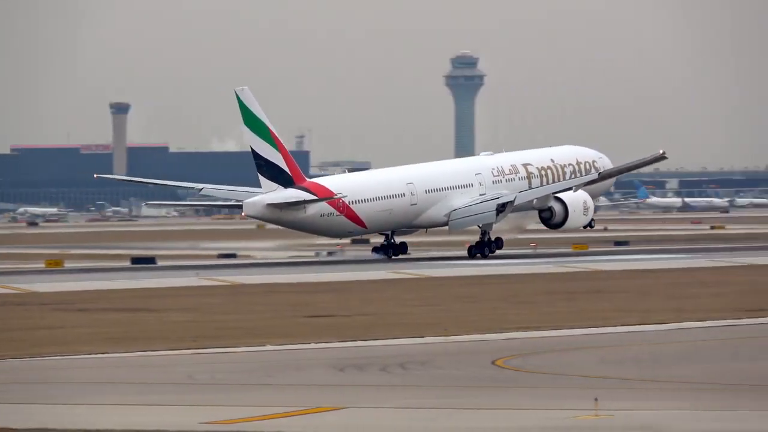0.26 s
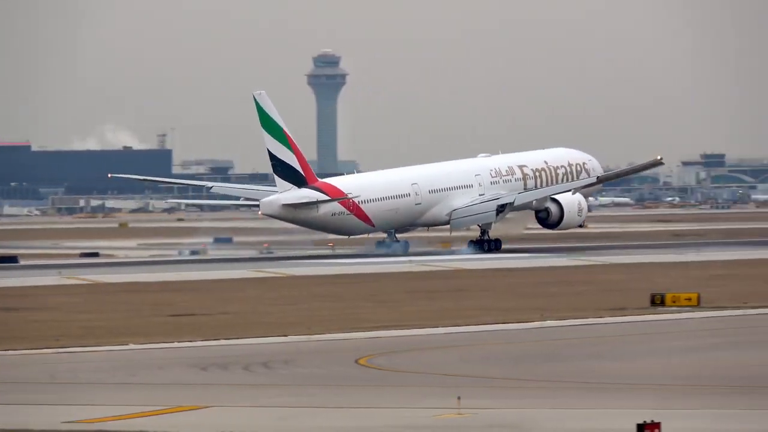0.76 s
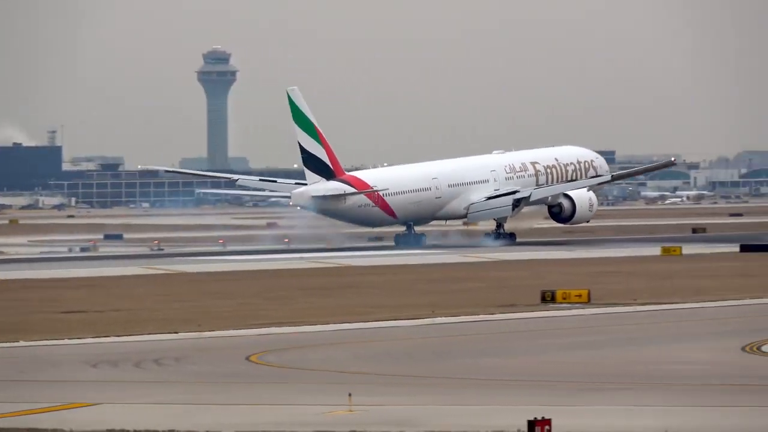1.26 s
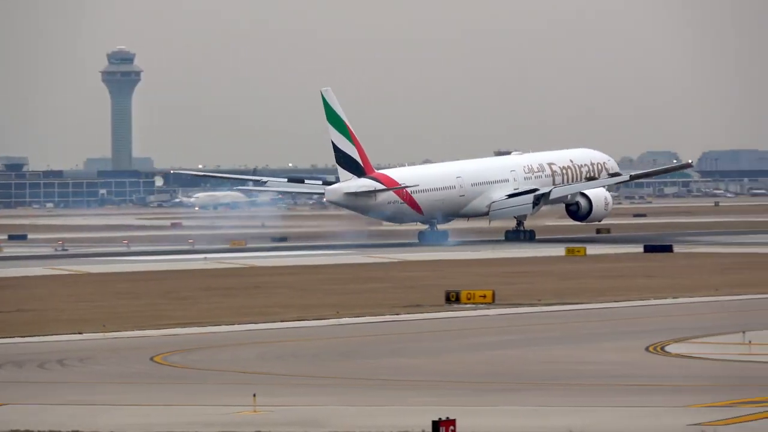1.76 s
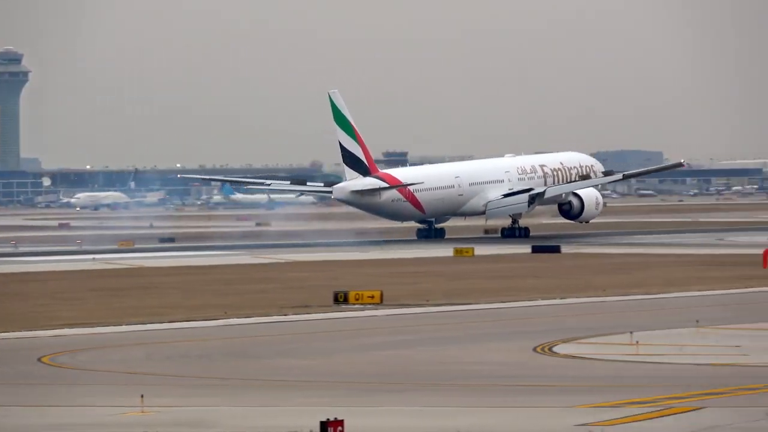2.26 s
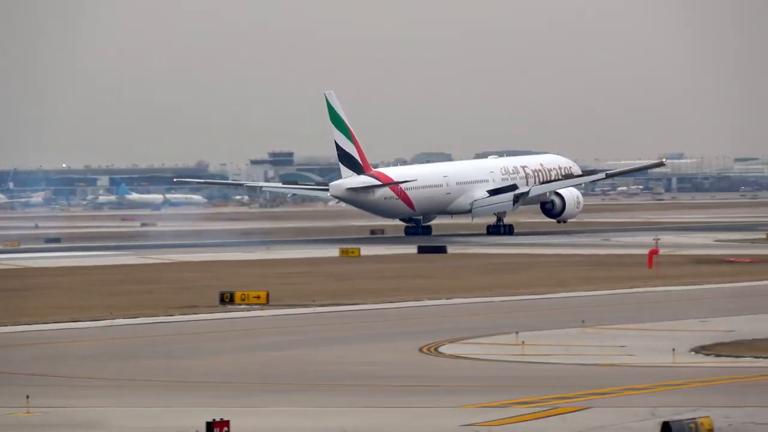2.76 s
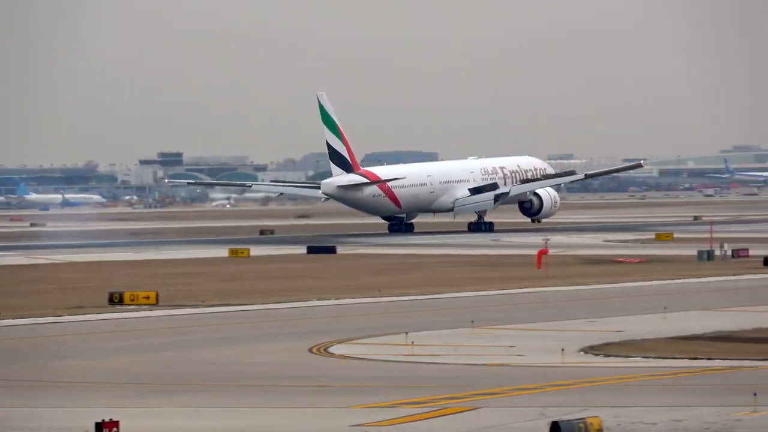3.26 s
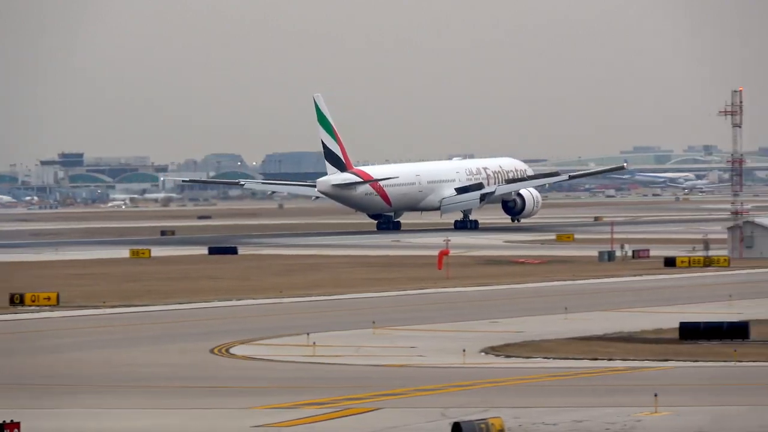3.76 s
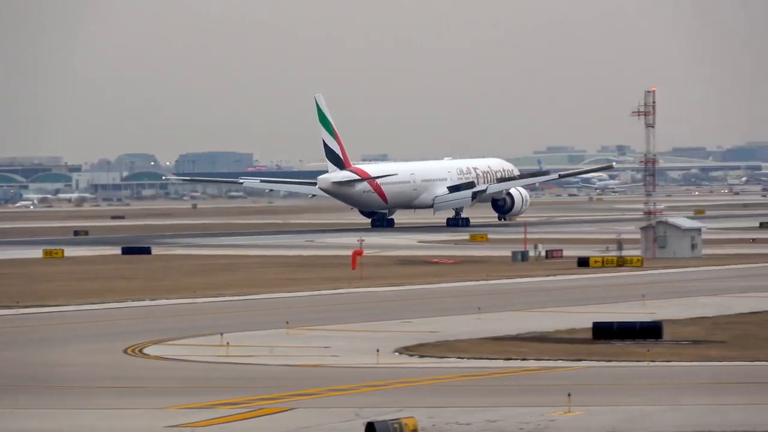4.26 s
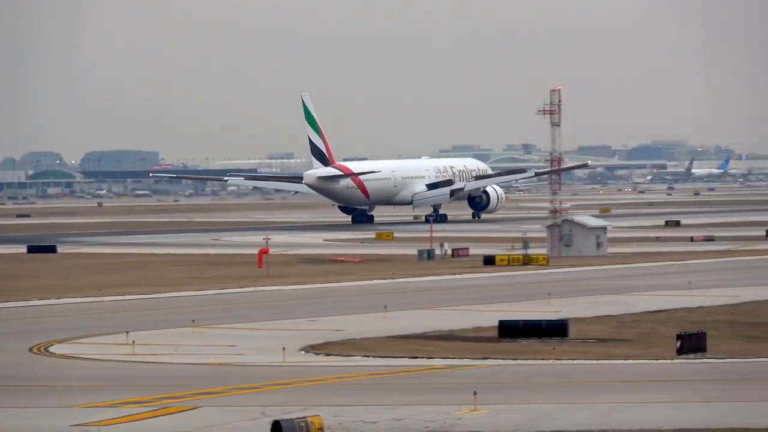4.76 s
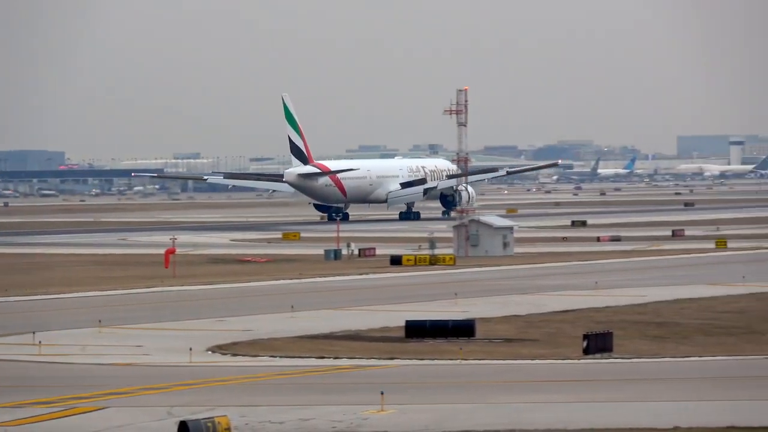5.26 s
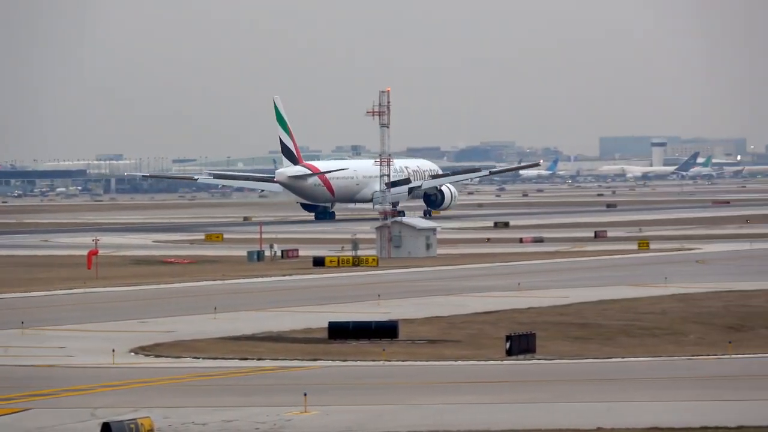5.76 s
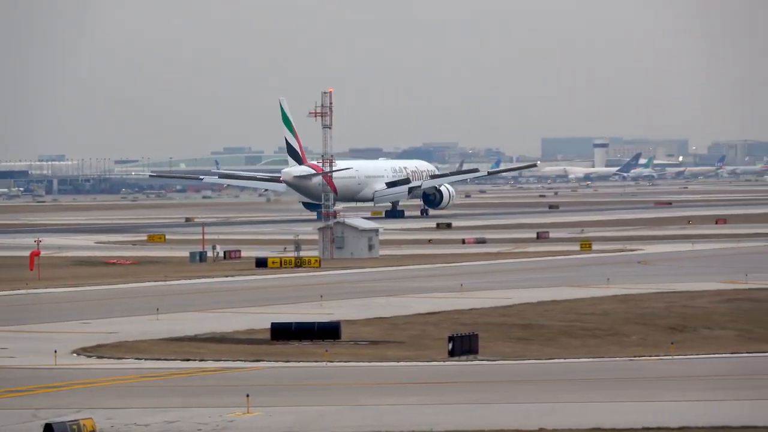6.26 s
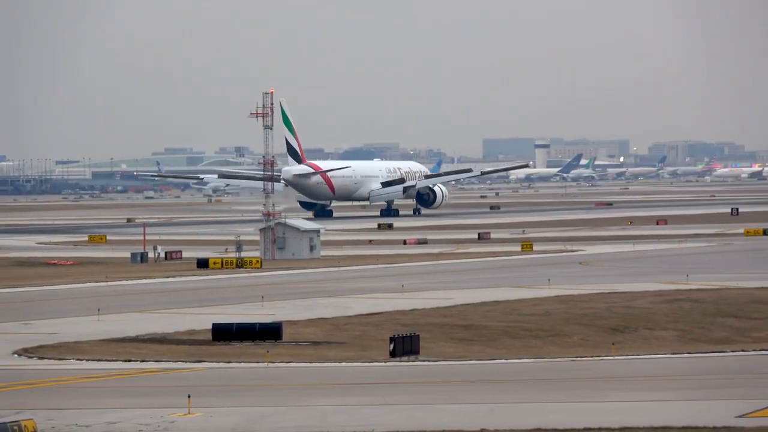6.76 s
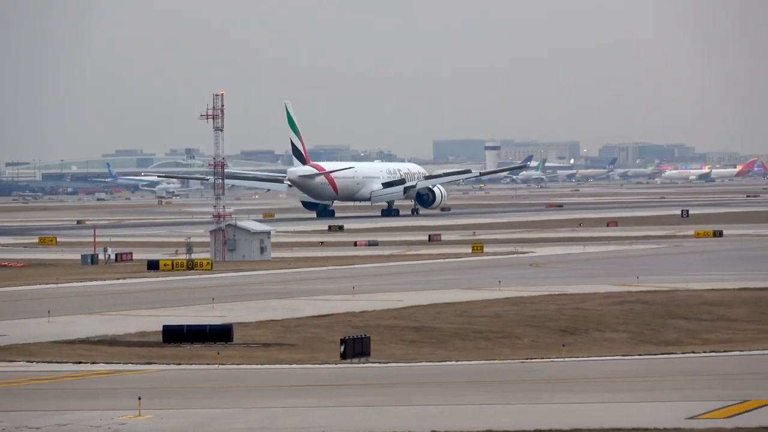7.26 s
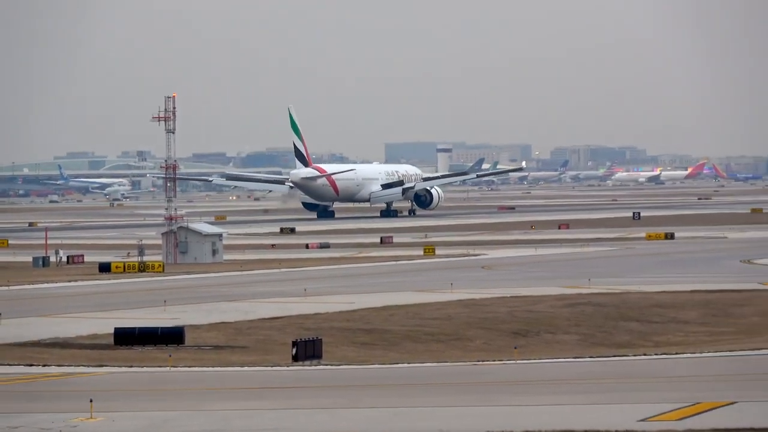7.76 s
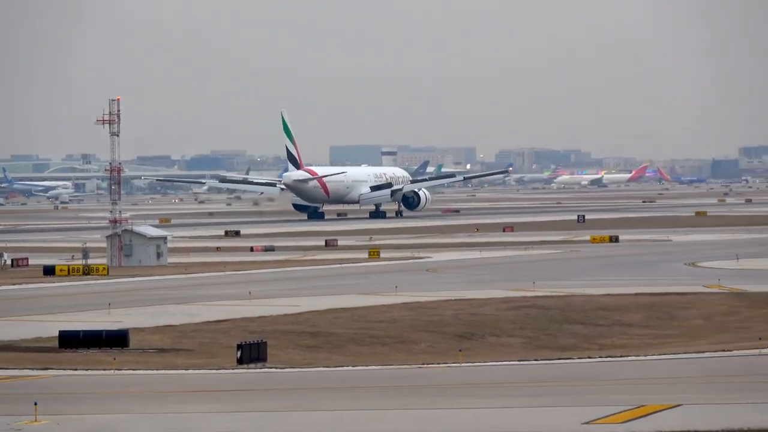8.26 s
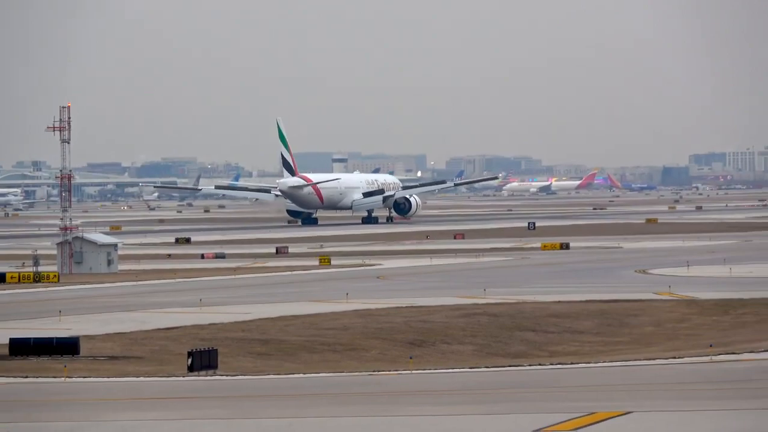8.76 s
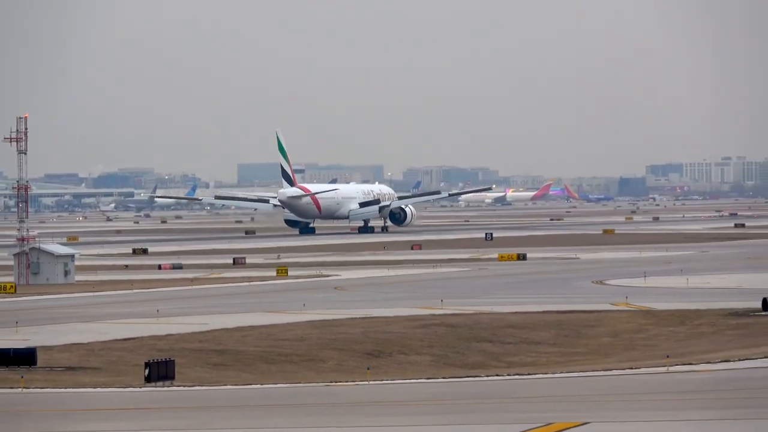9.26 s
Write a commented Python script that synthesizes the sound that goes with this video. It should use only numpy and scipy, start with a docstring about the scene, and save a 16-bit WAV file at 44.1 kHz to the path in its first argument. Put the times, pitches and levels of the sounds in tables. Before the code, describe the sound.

Deep jet rumble and roar build as a landing airliner recedes along the runway, with a sinking hollow tone, camera clicks and later small close ticks.

```python
"""At an airfield's edge, a wide-body airliner touches down and rolls away along the runway.
Its exhausts rumble and roar as shaped noise, and hiss more as the nozzles turn towards the listener.
A sinking airframe tone (two sine partials) fades after touchdown and a blurred fan whine takes over.
Shutter bursts, ringing ticks, clicks and a tiny squeak sound close by, over a low far drone and faint hiss."""
import sys
import numpy as np
from scipy import signal
from scipy.fft import rfft, irfft, next_fast_len
from scipy.io import wavfile
from scipy.ndimage import uniform_filter1d, map_coordinates

SR = 44100
rng = np.random.default_rng(int(sys.argv[2]) if len(sys.argv) > 2 else 0)


def file_out(sig):
    """Save sig as 16-bit WAV at sys.argv[1]."""
    # one column per channel
    cols = np.atleast_2d(sig).T
    # limit, then scale
    lim = np.clip(cols, -1, 1)
    pcm = np.round(lim * 32767).astype(np.int16)
    wavfile.write(sys.argv[1], SR, pcm)


N = 420273
TOP_HZ = 15700  # upper band limit
REFERENCE_DB = -23  # jet strength at which the layers it drives have their stated levels

# strength of the exhaust as it reaches the listener: (time [s], level [dB])
JET_STRENGTH = [(0, -25.5), (1.2, -26.5), (2.2, -27), (3, -26), (3.45, -27), (4, -25), (4.3, -23.5),
                (4.75, -22.5), (5.3, -21.5), (5.9, -19.5), (6.3, -20), (6.8, -19), (7.3, -17.5),
                (7.9, -18.5), (8.5, -17.5), (9.05, -16.5), (9.53, -16.5)]


def amp(db):
    """Decibels to gain."""
    return 10 ** (np.asarray(db) / 20)


def unit(x):
    """Scale to rms 1."""
    return x / np.sqrt(np.mean(x ** 2) + 1e-20)


def clock():
    """The time of every sample in seconds."""
    return np.arange(N) / SR


def curve(rows):
    """Join rows of (time, value) by straight lines, one value per sample."""
    times, values = np.transpose(rows)
    return np.interp(clock(), times, values)


def wobble(rate):
    """A smooth random curve, rate knots a second."""
    knots = rng.standard_normal(int(N * rate / SR) + 4)
    return map_coordinates(knots, [np.arange(N) * rate / SR])


def filtered(x, response):
    """Shape x by a gain that depends on frequency."""
    size = next_fast_len(N + SR // 2)
    gain = response(np.fft.rfftfreq(size, 1 / SR))
    return irfft(rfft(x, size) * gain, size)[:N]


def turbulence(spectrum, patchy_db):
    """Coloured noise of rms 1; moving air lifts and sinks patches of it in time and frequency."""
    grains = signal.stft(rng.standard_normal(N), nperseg=1024)[2]
    patches = uniform_filter1d(rng.standard_normal(grains.shape), size=8, axis=0)
    patches = uniform_filter1d(patches, size=12, axis=1)
    noise = signal.istft(grains * amp(patchy_db * unit(patches)), nperseg=1024)[1][:N]
    corner_hz, corner_db = np.transpose(spectrum)
    return unit(filtered(noise, lambda hz: amp(np.interp(np.log(hz + 1), np.log(corner_hz), corner_db))))


def steadied(x, seconds):
    """Noise that keeps its grain but holds an even strength over longer spans."""
    power = np.abs(uniform_filter1d(x ** 2, size=max(int(seconds * SR), 1)))
    return unit(x / np.sqrt(power + 1e-9))


def band(centre_hz, width_hz):
    """Noise of rms 1 in one resonance with steep skirts."""
    return unit(filtered(rng.standard_normal(N), lambda hz: 1 / (1 + ((hz - centre_hz) / width_hz) ** 2)))


def phase(hz):
    """Running phase of a gliding frequency."""
    return 2 * np.pi * np.cumsum(hz) / SR


def tone(hz, flutter_db):
    """A line of rms 1 whose strength flutters on its way through the air."""
    line = np.sin(phase(hz) + rng.uniform(0, 2 * np.pi))
    return unit(line * amp(flutter_db * wobble(17)))


def release(end_s):
    """Gain that holds until end_s, then dies away at 45.5 dB per second."""
    return amp(-45.5 * np.maximum(clock() - end_s, 0))


def strikes(rows):
    """Envelope of sudden, dying blows from rows (time [s], peak [dB], t60 [s])."""
    envelope, t = np.zeros(N + SR), np.arange(SR // 5) / SR
    for s, db, t60 in rows:
        envelope[round(s * SR):][:len(t)] += amp(db - 60 * t / t60)
    return envelope[:N]


def jet_rise_db():
    """Strength of the exhaust above the reference, in dB."""
    return curve(JET_STRENGTH) - REFERENCE_DB


def exhaust():
    """One jet strength drives big eddies that rumble and smaller ones that roar and rush.

    The gap between rumble and roar is the notch left by the ground reflection.
    """
    # colours of the eddies, large to small: (frequency [Hz], relative level [dB])
    rumble_colour = [(15, -35), (28, -17), (40, -7), (52, -0.5), (65, 1), (85, -1.5), (115, -7),
                     (150, -25.5), (220, -35), (500, -82)]
    roar_colour = [(90, -31.5), (160, -11), (230, -4), (310, -0.5), (390, -0.5), (495, -0.5), (600, -6.5),
                   (760, -14), (1100, -29), (2500, -80.5)]
    far_roar_colour = [(90, -30), (160, -11), (230, -2.5), (310, 0), (390, 1.5), (490, -1), (600, -8.5),
                       (760, -10), (1100, -29), (2500, -80.5)]
    rush_colour = [(350, -32), (600, -3.5), (780, -1.5), (970, 1), (1130, -2.5), (1300, -7), (1450, -11),
                   (1700, -23.5), (2200, -42), (4000, -92)]
    # the air briefly carries the rush better: (time [s], gain [dB], half length [s])
    rush_swells = [(2.9, 0, 0.39), (5.96, 2, 0.1), (7.301, 4, 0.45)]
    # the rumble jumps as the thrust reversers open, then settles
    reverse_s, reverse_attack_s, reverse_db, reverse_settle_s = 3.2, .2, 2.5, 3.5
    # the roar sinks in pitch as the airliner draws away
    recede_start_s, recede_s = 5.5, 3.3

    rise_db = jet_rise_db()
    # level at the reference strength [dB] + dB gained per dB of jet strength
    rumble_level = amp(-23 + 0.78 * rise_db)
    roar_level = amp(-22.5 + rise_db)
    rush_level = amp(-29.5 + 0.88 * rise_db)

    since = np.maximum(clock() - reverse_s, 0)
    thrust_db = reverse_db * np.minimum(since / reverse_attack_s, 1) * np.exp(-since / reverse_settle_s)
    rumble_gain = rumble_level * amp(thrust_db + 0.63 * wobble(7))
    rumble = rumble_gain * steadied(turbulence(rumble_colour, patchy_db=0.0), seconds=0.28)

    far = np.clip((clock() - recede_start_s) / recede_s, 0, 1)
    near_eddies = np.sqrt(1 - far) * turbulence(roar_colour, patchy_db=1.45)
    far_eddies = np.sqrt(far) * turbulence(far_roar_colour, patchy_db=1.5)
    roar = roar_level * steadied(near_eddies + far_eddies, seconds=.18)

    swell_db = sum(db * np.exp(-((clock() - s) / half) ** 2) for s, db, half in rush_swells)
    rush = rush_level * amp(swell_db) * turbulence(rush_colour, patchy_db=1.0)
    return rumble + roar + rush


def surges():
    """Now and then one register of the roar, a resonant band of noise, swells and sinks back."""
    # (time [s], half length [s], centre [Hz], width [Hz], level [dB])
    roar_surges = [(4.2, 0.49, 205, 45, -36.5), (4.753, 0.25, 477, 70, -30.5), (7.298, 0.54, 112, 18, -30)]
    total = np.zeros(N)
    for s, half, hz, width, db in roar_surges:
        total += amp(db) * np.exp(-((clock() - s) / half) ** 2) * band(hz, width)
    return total


def thumps():
    """A few cycles of low pressure swell and die within the rumble."""
    # (time [s], peak [dB])
    low_thumps = [(3.70, -20), (5.078, -10.5), (5.694, -13.5)]
    thump_hz, half_s = 72, 0.026
    total = np.zeros(N)
    for s, db in low_thumps:
        t = clock() - s
        bell_db = -8.7 * np.minimum((t / half_s) ** 2, 20)
        total += amp(db + bell_db) * np.cos(2 * np.pi * thump_hz * t)
    return total


def treble():
    """The exhaust's fine eddies hiss and sizzle out of the shade as the nozzles turn to the listener."""
    # colours of the fine eddies: (frequency [Hz], relative level [dB])
    hiss_colour = [(1500, -21), (2600, 5.5), (3100, 4), (3400, 0.5), (3900, 0.5), (4250, -4.5),
                   (4600, -9.5), (5200, -15.5), (6300, -28.5), (8000, -44.5), (16000, -65.5)]
    sizzle_colour = [(3500, -30), (4900, 0), (5800, 5), (6600, -2), (7600, -7.5), (10000, -14.5),
                     (12000, -18.5), (16000, -40)]
    # the air carries the treble now better, now worse: (time [s], gain [dB])
    air_drift = [(0, 0.5), (4.3, 0.5), (4.6, -2), (5.0, 0), (5.6, 0), (6.1, -2.5), (6.6, 1), (7.3, 0),
                 (8.5, 0), (9.05, 2), (9.53, 0)]
    # the hiss opens over turn_s; the finest sizzle creeps up with a longer lag
    turn_start_s, turn_s, sizzle_lag_s = 2.07, 3.46, 4.24
    # levels out of the shade, and the loss in full shade
    hiss_db, hiss_shade_db, sizzle_db, sizzle_shade_db = -50.5, 22.5, -56.5, 44

    since = np.maximum(clock() - turn_start_s, 0)
    hiss_shade = (1 + np.cos(np.pi * np.minimum(since / turn_s, 1))) / 2
    sizzle_shade = np.exp(-since / sizzle_lag_s)
    hiss = amp(hiss_db - hiss_shade_db * hiss_shade) * turbulence(hiss_colour, patchy_db=1.6)
    sizzle = amp(sizzle_db - sizzle_shade_db * sizzle_shade) * turbulence(sizzle_colour, patchy_db=0.5)
    return amp(curve(air_drift)) * (hiss + sizzle)


def airframe():
    """Air rushes over flaps and gear and blows a hollow tone across an opening in the wing."""
    # strength of the air rush: (time [s], relative level [dB])
    rush_strength = [(0, -39.5), (.4, -38), (.7, -41.5), (3.6, -44), (5.9, -39.5), (6.8, -40.5),
                     (7.35, -37.5), (8, -42), (9.53, -40)]
    # colour of the air rush: (frequency [Hz], relative level [dB])
    flap_colour = [(700, -20), (1200, 2), (1600, 1.5), (1800, -3), (2100, -8), (2350, -10), (2650, -10.5),
                   (2950, -19), (3400, -33), (4500, -57), (7000, -90)]
    # the tone sinks with speed and Doppler shift: (time [s], mean frequency [Hz])
    howl_pitch = [(0, 308.7), (1.4, 289.7), (3.1, 279.3)]
    # strength of its fundamental, then of its octave: (time [s], level [dB])
    first_strength = [(0, -25.5), (.3, -34.5), (.45, -25.5), (.53, -38), (.62, -28), (.8, -33), (1, -27),
                      (1.17, -24.5), (1.32, -30), (1.43, -37), (1.82, -35.5), (2.5, -37)]
    octave_strength = [(0, -33.5), (.55, -32.5), (1, -36), (1.33, -32.5), (1.5, -43), (1.75, -32.5),
                       (2, -48)]

    hz = curve(howl_pitch) * (1 + .003 * wobble(25))
    first = amp(curve(first_strength)) * tone(hz, flutter_db=2.0)
    octave = amp(curve(octave_strength)) * tone(2 * hz, flutter_db=1.0)
    rush = amp(curve(rush_strength) + 3.5) * turbulence(flap_colour, patchy_db=1.2)
    return release(2.7) * (first + octave) + rush


def fans():
    """Thin idle tones give way to a blade whine that the exhaust's turbulence smears into a narrow band."""
    # the idle comes and goes: (time [s], level [dB])
    idle_strength = [(0, -43), (.48, -38.5), (.7, -47), (.9, -46), (1.13, -37.5), (1.38, -45), (1.62, -37),
                     (1.8, -39), (2.05, -49), (2.7, -49), (2.92, -43), (3.2, -48)]
    # its tones: (mean frequency [Hz], level relative to the idle [dB], held until [s])
    idle_tones = [(744, 1, 3.15), (1310, -9.5, 2.1)]
    # centre of the blade whine: (time [s], frequency [Hz])
    whine_pitch = [(2.4, 1253), (2.85, 1266), (3.1, 1240), (3.37, 1256), (3.53, 1213), (3.72, 1261),
                   (4.3, 1261), (4.53, 1228), (4.9, 1247), (5.5, 1263), (6.4, 1263), (7.5, 1214),
                   (9.53, 1192)]
    # strength of the whine, shared by core and skirt: (time [s], relative level [dB])
    whine_strength = [(0, -69), (2.1, -56), (2.4, -40), (2.7, -40), (3.0, -35.5), (3.2, -39.5),
                      (3.39, -31.5), (3.7, -35), (4.0, -38.5), (4.35, -32), (8.3, -33), (9.53, -30.5)]

    drift = 1 + 0.0038 * wobble(30)
    idle_db = curve(idle_strength)
    idle = np.zeros(N)
    for hz, db, end_s in idle_tones:
        idle += amp(idle_db + db) * release(end_s) * tone(hz * drift, flutter_db=2.0)

    # a wavering core line inside a skirt of scattered sound; the stronger the jet, the less core is left
    blade_hz = curve(whine_pitch)
    rise_db = jet_rise_db()
    core = amp(-5.5 - 0.3 * rise_db) * tone(blade_hz * (1 + .012 * wobble(45)), flutter_db=5.0)
    # a noise band made at 300 Hz is shifted up to follow the blades
    low_band = signal.hilbert(band(300, width_hz=55))
    skirt = unit(np.real(low_band * np.exp(1j * phase(blade_hz - 300))))
    skirt_level = amp(np.minimum(0.61 * rise_db, 0))
    return idle + amp(curve(whine_strength)) * (core + skirt_level * skirt)


def shutters():
    """Two cameras fire in turn; each frame is a quick run of sharp contacts that ring the camera's body."""
    # contacts of a bright mechanism, likely a shutter firing twice: (time [s], relative level [dB])
    bright_contacts = [(.562, -58), (.643, -60), (.655, -55.5), (.681, -56.5), (.698, -57), (.721, -55.5),
                       (.819, -58.5), (.898, -58), (.913, -55), (.936, -56.5), (.954, -53.5), (.978, -57)]
    # frames in the burst of a duller shutter: (time [s], relative level [dB])
    dull_frames = [(1.195, -61.5), (1.459, -60), (1.709, -59.5), (1.965, -60), (2.221, -59.5)]
    # contacts within each dull frame: (lag [s], relative level [dB], t60 [s])
    frame_contacts = [(0, 3.5, 0.02), (.028, 5, .02), (.036, -3.5, .25), (.078, -3, .1)]
    # ring of the two bodies: (frequency [Hz], relative level [dB])
    bright_colour = [(1500, -20), (4000, -12), (6300, -15.5), (7300, -4.5), (8100, -19), (9100, 2.5),
                     (9900, -14), (10700, -3.5), (12500, -18.5), (16000, -29.5)]
    dull_colour = [(1500, -8.5), (3300, -4), (4000, -2), (4600, -3), (5800, -3), (7000, -9), (9000, -6.5),
                   (11000, -8), (16000, -26)]

    bright_rows = [(s, db - 7.5, .04) for s, db in bright_contacts]
    dull_rows, ring_rows = [], []
    for s, db in dull_frames:
        dull_rows += [(s + lag, db + part_db - 6, t60) for lag, part_db, t60 in frame_contacts]
        # the first two contacts also ring a narrow mode of the body
        ring_rows += [(s + lag, db - 6, .045) for lag, _, _ in frame_contacts[:2]]
    bright = strikes(bright_rows) * turbulence(bright_colour, patchy_db=1.2)
    dull = strikes(dull_rows) * turbulence(dull_colour, patchy_db=0.5)
    ring = strikes(ring_rows) * band(4000, width_hz=300)
    return bright + dull + ring


def near_ticks():
    """Close by, faint dry ticks ring the modes of a small hard part, and brighter noise clicks crack."""
    # (time [s], relative level [dB])
    tick_rows = [(6.086, -52), (6.416, -44), (7.379, -44), (7.695, -47), (8.009, -43), (8.321, -35.5),
                 (8.632, -40.5), (8.944, -41), (9.256, -44)]
    # what a tick rings with: (mean frequency [Hz], relative level [dB], t60 [s])
    tick_modes = [(4800, -9, .014), (5230, -6, .012), (5670, -4.5, .012), (6200, -7, 0.0089)]
    # (time [s], relative level [dB], t60 [s])
    click_rows = [(7.625, -32.5, .008), (7.630, -49, .04), (7.636, -46.5, .06), (7.843, -57, .03),
                  (7.94, -54, 0.023), (8.653, -53, 0.018), (9.174, -47.5, .015)]
    # (frequency [Hz], relative level [dB])
    click_colour = [(2500, -12.5), (5500, -3), (8000, -3.5), (10000, 2.5), (12000, -5), (14000, -3),
                    (16000, -11.5)]

    ticks, t = np.zeros(N), np.arange(SR // 20) / SR
    onset = 1 - np.exp(-t / .0002)
    for s, db in tick_rows:
        ring = np.zeros(len(t))
        for hz, part_db, t60 in tick_modes:
            struck_hz = hz * rng.normal(1, .02)
            ring += amp(part_db - 60 * t / t60) * np.sin(2 * np.pi * struck_hz * t)
        ticks[round(s * SR):][:len(t)] += amp(db) * ring * onset
    clicks = amp(-9.0) * strikes(click_rows) * turbulence(click_colour, patchy_db=0.5)
    return ticks + clicks


def squeak():
    """Something near the microphone slips in a quick, slowing run; only the high overtones sound."""
    centre_s, half_s, level_db = 9.045, .011, -60
    slip_hz, sag_hz_per_s, lowest_hz = 800, 900, 6800
    # time from the middle of the squeak, held still well outside it
    t = np.clip(clock() - centre_s, -4 * half_s, 4 * half_s)
    slips = phase(slip_hz - sag_hz_per_s * t)
    overtones = np.arange(np.ceil(lowest_hz / slip_hz), TOP_HZ / slip_hz)
    buzz = unit(sum(np.sin(k * slips + rng.uniform(0, 2 * np.pi)) for k in overtones))
    return amp(level_db) * np.exp(-(t / half_s) ** 2) * buzz


def airfield():
    """Far traffic drones underneath as steady low noise, whatever the airliner does."""
    # (frequency [Hz], relative level [dB])
    drone_colour = [(50, -29.5), (100, -4), (135, -2), (170, -9), (260, -26.5), (1000, -90)]
    return amp(-34.0) * turbulence(drone_colour, patchy_db=0.9)


def background_hiss():
    """Faint noise, nearly flat across the spectrum, lies under everything."""
    # (time [s], level [dB])
    hiss_strength = [(0, -74.5), (1, -73), (3, -70), (4.8, -68.5), (8, -74), (9.53, -69.5)]
    # (frequency [Hz], relative level [dB])
    floor_colour = [(20, 2.5), (4000, -1.5), (9000, 0.5), (13000, -0.5), (16000, -2.5)]
    return amp(curve(hiss_strength)) * turbulence(floor_colour, patchy_db=0.5)


def scene():
    """The airliner, the small sounds near the microphone and the airfield, in mono."""
    airliner = exhaust() + surges() + thumps() + treble() + airframe() + fans()
    close_by = shutters() + near_ticks() + squeak()
    background = airfield() + background_hiss()
    return (airliner + close_by + background)[None]


def record(dry):
    """The microphone's channel passes nothing above its band limit."""
    return np.array([filtered(channel, lambda hz: hz < TOP_HZ) for channel in dry])


dry = scene()
out = record(dry)
file_out(out)
```